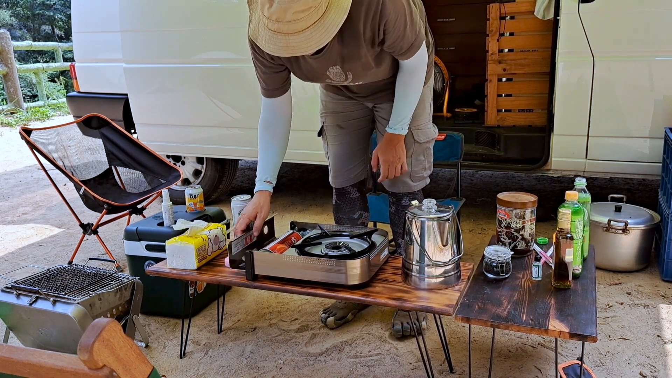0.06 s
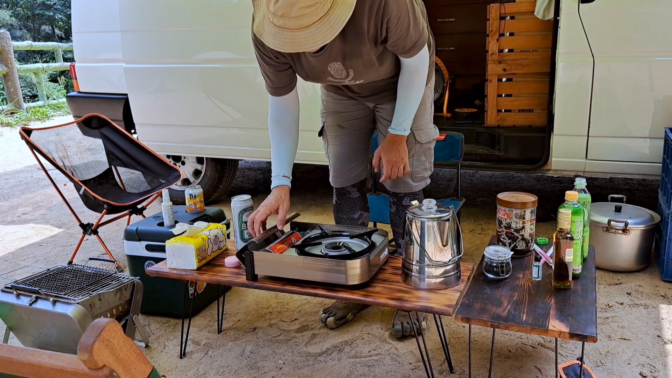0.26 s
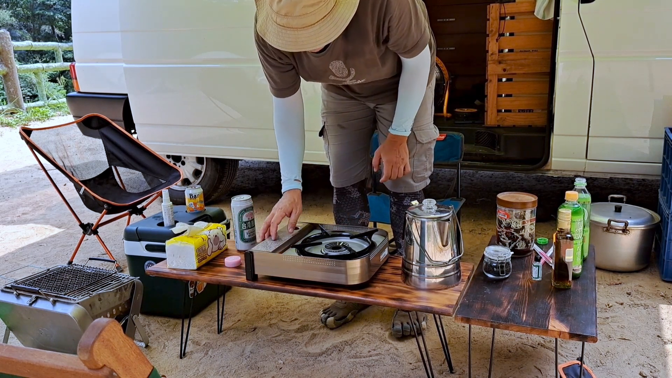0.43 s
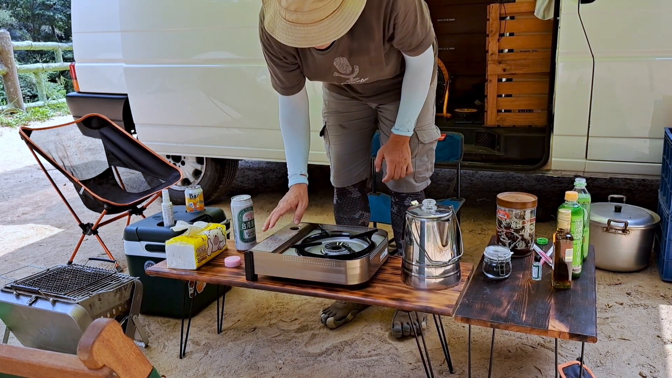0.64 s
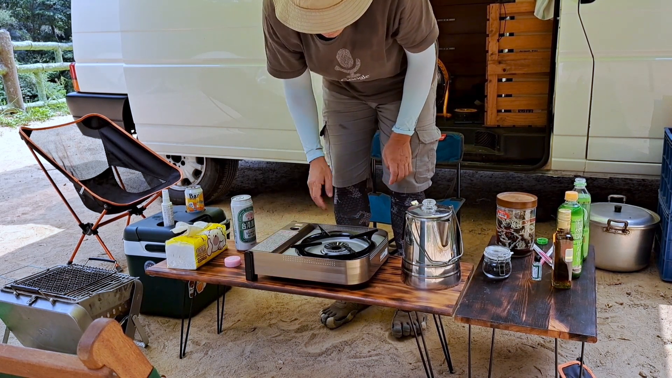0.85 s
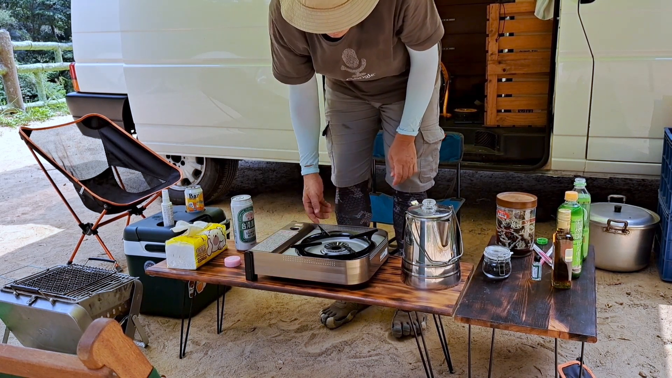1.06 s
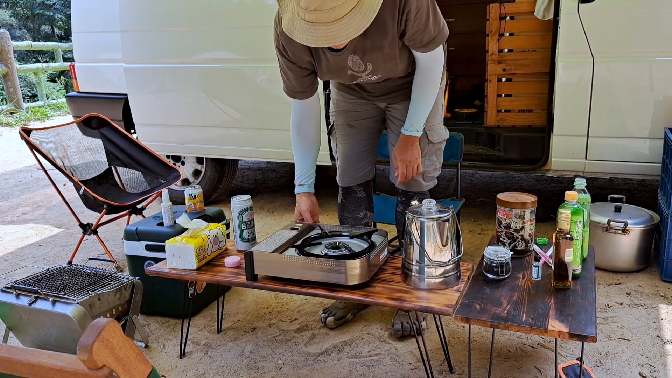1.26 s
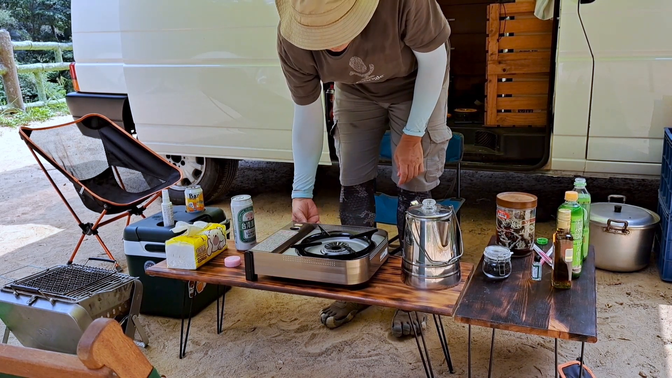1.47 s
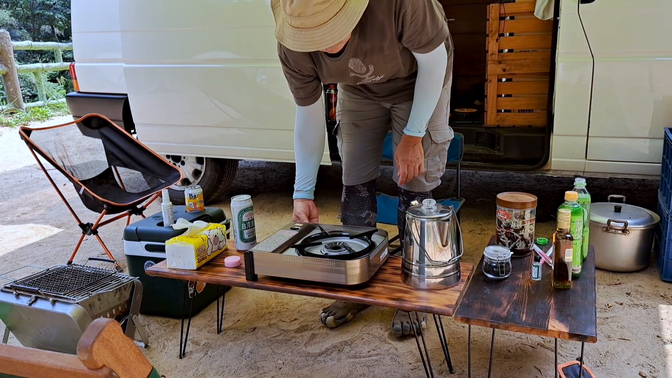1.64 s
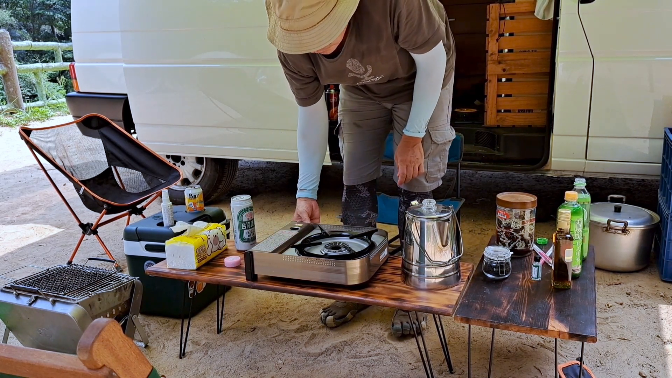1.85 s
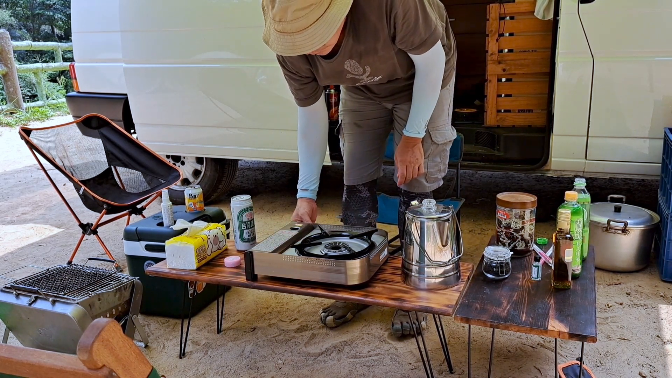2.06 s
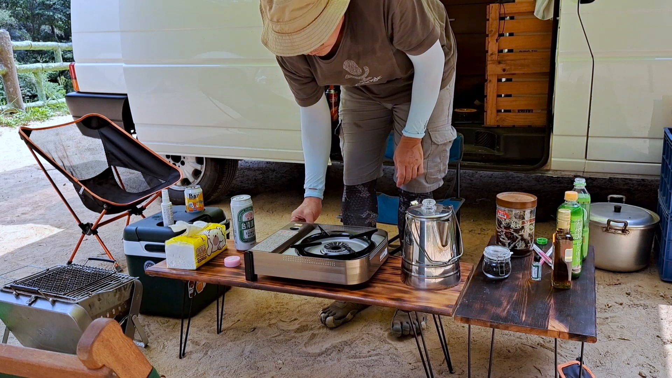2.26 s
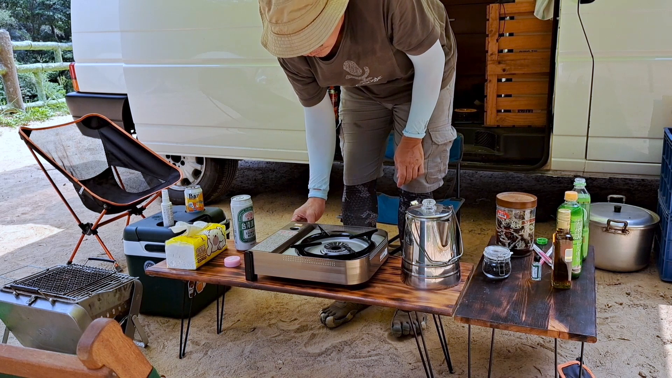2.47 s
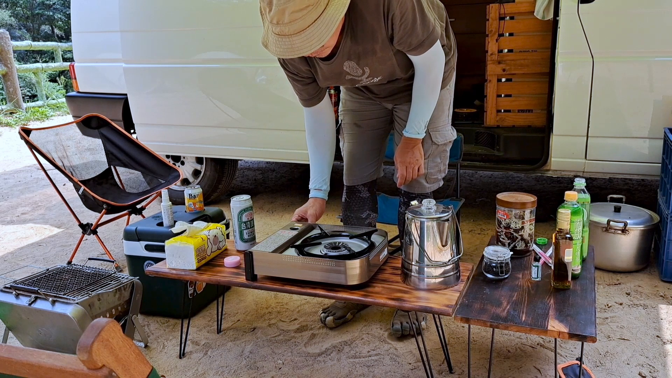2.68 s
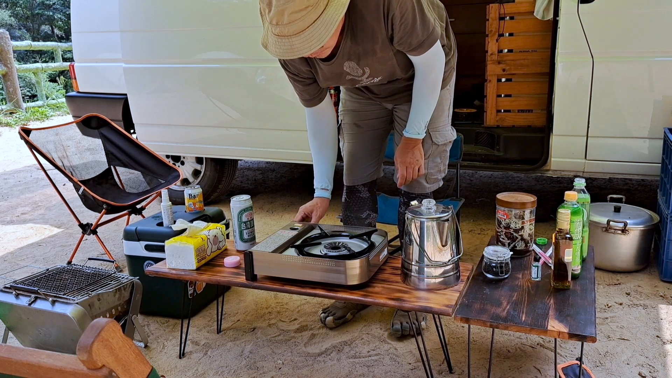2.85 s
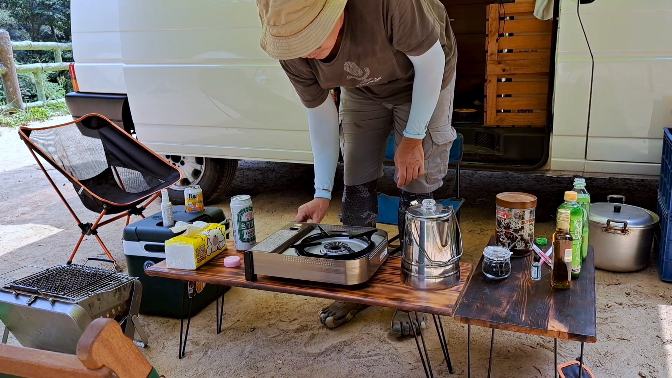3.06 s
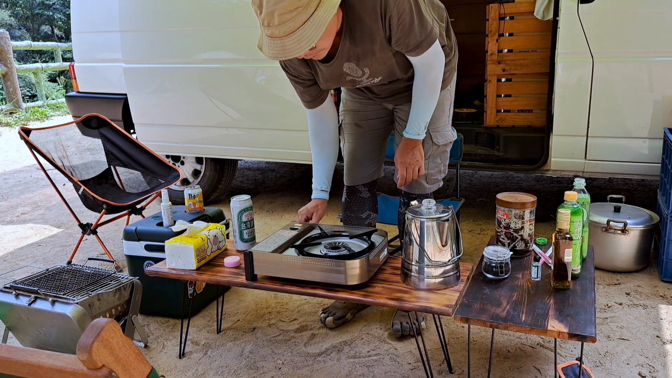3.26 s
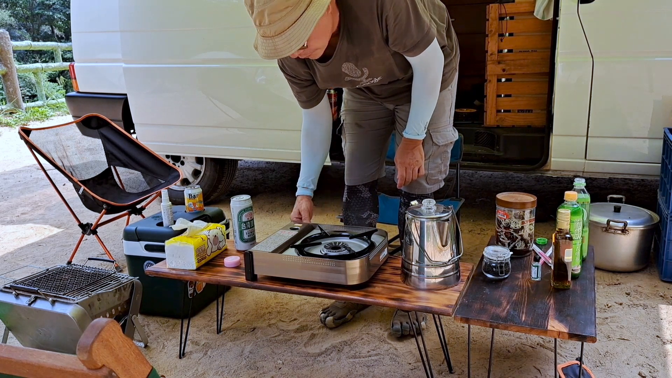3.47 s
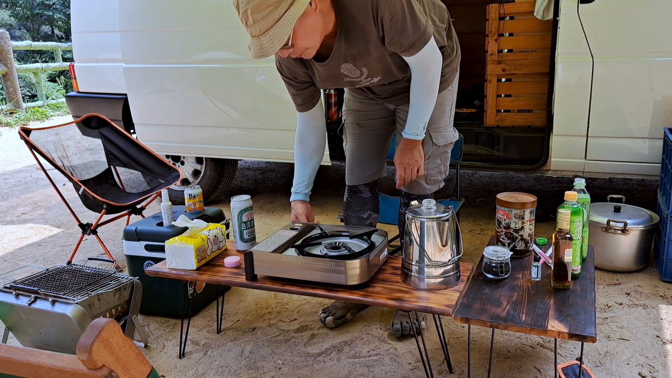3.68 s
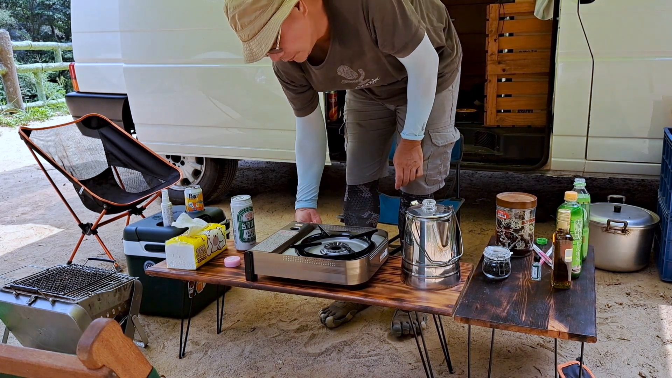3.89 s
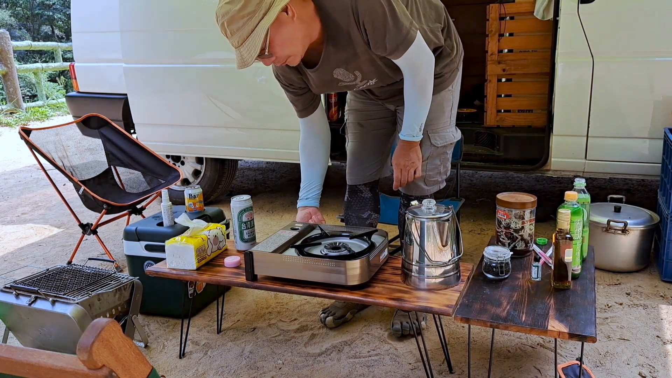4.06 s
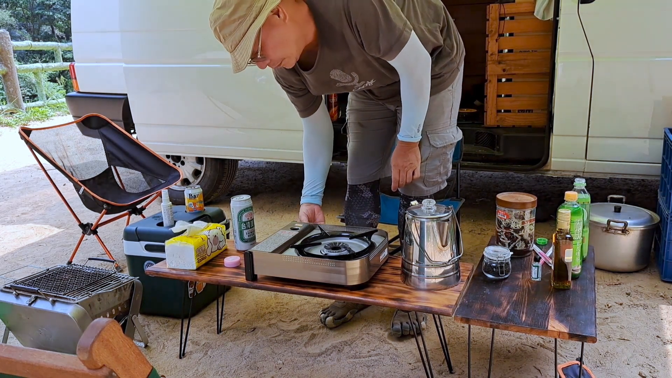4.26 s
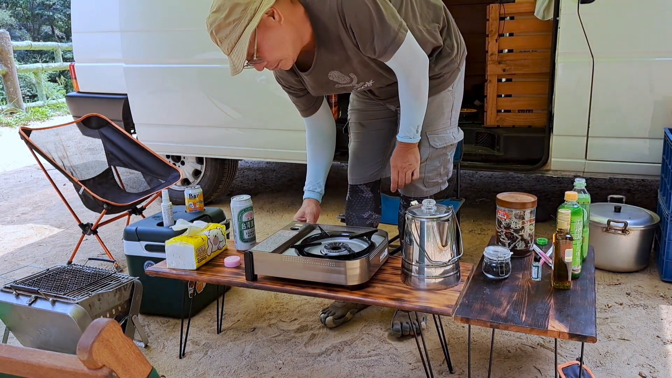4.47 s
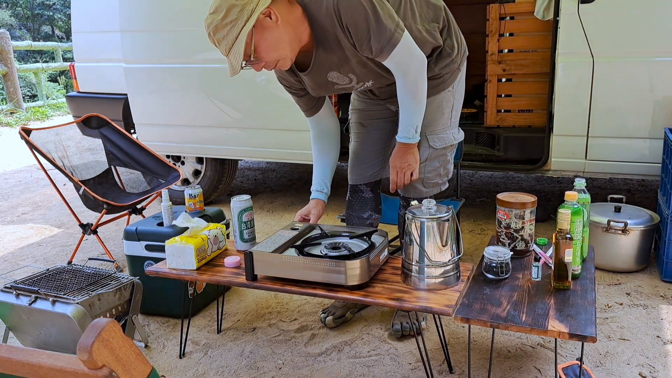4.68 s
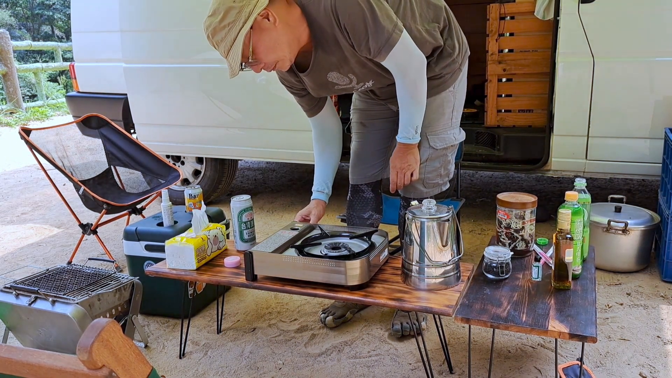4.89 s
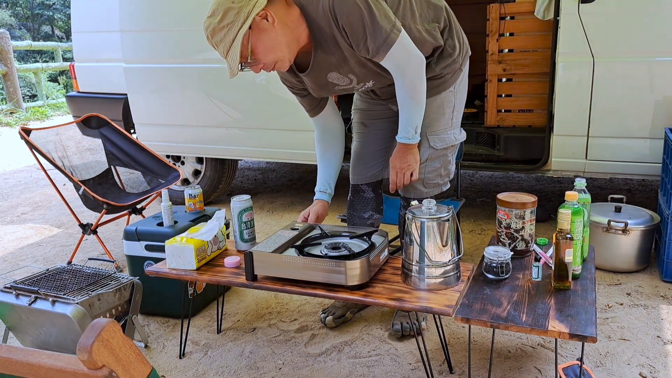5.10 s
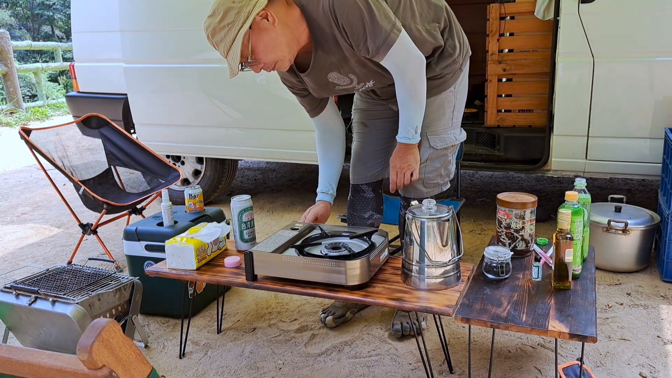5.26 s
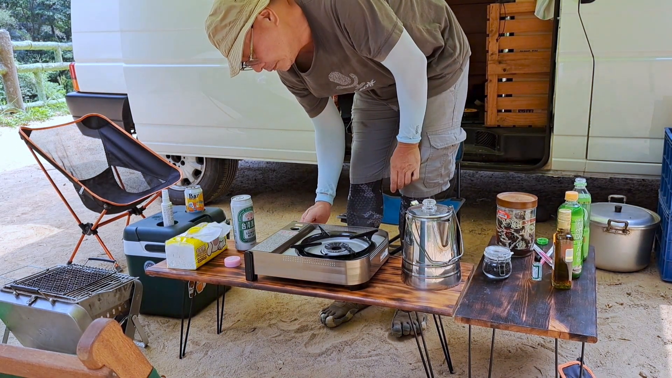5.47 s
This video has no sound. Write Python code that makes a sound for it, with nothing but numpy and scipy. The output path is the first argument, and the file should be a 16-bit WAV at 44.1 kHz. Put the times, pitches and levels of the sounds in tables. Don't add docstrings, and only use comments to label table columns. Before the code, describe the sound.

A tin stove lid slams shut, then fingers tap the metal case, a knob clicks twice and a lever clatters, over faint outdoor rumble.

```python
import sys
import numpy as np
from scipy import signal
from scipy.fft import rfft, irfft
from scipy.io import wavfile
from scipy.ndimage import uniform_filter1d

SR = 44100
rng = np.random.default_rng(int(sys.argv[2]) if len(sys.argv) > 2 else 0)


def ratio_of_db(decibels):
    return 10 ** (np.asarray(decibels, float) / 20)


def dump(signal):
    limited = np.clip(np.atleast_2d(signal).T, -1, 1)
    pcm = np.round(limited * 32767).astype(np.int16)
    wavfile.write(sys.argv[1], SR, pcm)


N = 243873


def evened(x):
    return x / np.sqrt(np.mean(x ** 2) + 1e-20)


def read(points, hz):
    f, value = np.transpose(points)
    return np.interp(np.log(hz + 1), np.log(f + 1), value)


def curves(rows):
    s, *columns = np.transpose(rows)
    return [np.interp(np.arange(N) / SR, s, column) for column in columns]


def add(mix, start_s, sound):
    part = mix[:, max(round(start_s * SR), 0):][:, :sound.shape[1]]
    part += sound[:, :part.shape[1]]


def ports(pair, likeness, lag=0):
    a, b = rfft(pair)
    hz = np.fft.rfftfreq(pair.shape[1], 1 / SR)
    same = np.clip(read(likeness, hz), 0, 1)
    mid = np.sqrt((1 + same) / 2) * a
    side = np.sqrt((1 - same) / 2) * b
    delay = np.exp(-2j * np.pi * hz * lag / SR)
    return irfft([mid + side, (mid - side) * delay], pair.shape[1])


def causal(gain_db):
    log_gain = np.log(ratio_of_db(np.r_[gain_db, gain_db[-2:0:-1]]))
    return np.fft.ifft(np.exp(np.conj(signal.hilbert(log_gain)))).real[:len(gain_db)]


def whitening_db(x, size):
    power = (abs(rfft(x, 16384)) ** 2).mean(0)
    power = uniform_filter1d(power, size=size)[::8]
    return -10 * np.log10(power / power.mean() + 1e-6)


def field(spectrum, patchy_db, swell_db, size):
    frames, hz = 4 * N // size + 5, np.fft.rfftfreq(size, 1 / SR)
    a, b, c, d, patches = rng.standard_normal((frames, len(hz), 5)).T
    patches = uniform_filter1d(patches, size=10, axis=0)
    patches = evened(uniform_filter1d(patches, size=12, axis=1))
    swell = evened(uniform_filter1d(rng.standard_normal(frames), size=20))
    level_db = read(spectrum, hz)[:, None] + patchy_db * patches + swell_db * swell
    z = np.array([a + 1j * b, c + 1j * d]) * ratio_of_db(level_db)
    return evened(signal.istft(z, nperseg=size, noverlap=3 * size // 4)[1][:, :N])


# freq_hz, level_db (per Hz)
TRAFFIC_SPECTRUM = [(24, -60), (40, -32), (58, -14), (150, 0), (324, -3), (355, -7), (527, -7), (577, -6),
                    (1500, -20), (1950, -65), (3300, -120)]
# freq_hz, likeness (0 to 1, anything below 0 counts as 0)
AIR_LIKENESS = [(60, 0.65), (150, 0.88), (380, 0.87), (950, 0.13), (2380, 0.17), (5980, -1.1),
                (15000, -0.05)]
# time_s, level_db
TRAFFIC_NEARNESS = [(0, -55.5), (.5, -67.5), (1.14, -59), (1.56, -63), (2.88, -52.5), (3.9, -62),
                    (4.34, -59.5), (4.8, -53), (5.53, -55)]
# freq_hz, level_db (per Hz)
LEAF_SPECTRUM = [(650, 4.5), (1100, 0.5), (1490, -1.5), (2780, -3), (3340, -6.5), (3610, -6), (4690, -4),
                 (5810, -6), (7710, -5), (8440, -10.5), (14700, -14), (15700, -27.5), (16500, -56)]
# centre_hz, width_hz, level_db
INSECT_BANDS = [(6590, 470, -72), (7350, 100, -77)]


def air():
    near_db, = curves(TRAFFIC_NEARNESS)
    traffic = ports(field(TRAFFIC_SPECTRUM, patchy_db=2.5, swell_db=1.0, size=1024), AIR_LIKENESS)
    leaves = ports(field(LEAF_SPECTRUM, patchy_db=0.5, swell_db=0.76, size=1024), AIR_LIKENESS)
    leaf_db = -62 + 6.5 + 0.061 * (near_db - near_db.mean())
    mix = traffic * ratio_of_db(near_db - 2.5) + leaves * ratio_of_db(leaf_db)
    for hz, width, db in INSECT_BANDS:
        band = [(hz - 2 * width, -40), (hz, 0), (hz + 2 * width, -40)]
        mix += ratio_of_db(db) * field(band, patchy_db=5.0, swell_db=0.5, size=512)
    return mix


# time_s, firing_hz, level_db
MOTOR_COURSE = [(0, 71.3, -62), (.6, 72.2, -61.5), (1.2, 70.3, -73), (2, 70.2, -65), (3.1, 72, -64),
                (3.7, 71.24, -61.5), (4.8, 71.05, -63), (5.53, 71.04, -62.5)]
# multiple, level_db
MOTOR_ORDERS = [(1, -3.5), (2, 0), (3, 0), (4, -4), (5, -3.5), (7, -11.5), (8, -3.5), (10, -10)]


def motor():
    firing_hz, level_db = curves(MOTOR_COURSE)
    turns, hum = np.cumsum(firing_hz) / SR, np.zeros(N)
    for multiple, db in MOTOR_ORDERS:
        fade = np.interp(np.arange(N), np.linspace(0, N, 30), rng.standard_normal(30))
        phase = multiple * turns + 0.068 * fade + rng.random()
        hum += ratio_of_db(level_db + db + 4.9 * fade) * np.sin(2 * np.pi * phase)
    return hum


# freq_hz, level_db (per Hz)
BUFFET_SPECTRUM = [(15, -30), (35, -12), (60, 4.5), (100, -7.5), (160, -16), (300, -17), (600, -67)]
# peak_s, strength_db, left_minus_right_db, length_s
GUSTS = [(0, -51, -11, 0.028), (0.18, -58, 8, 0.15), (0.493, -44.5, -2, 0.058), (0.689, -40, 0, 0.032),
         (0.82, -53, 21, 0.066), (0.937, -61, -8, 0.063), (1.03, -49, -2, 0.057), (1.257, -50, 5, .14),
         (1.378, -54.5, 18, 0.038), (1.77, -58, -17, 0.039), (2.065, -55, -4, .03), (2.27, -68, -3, 0.117),
         (2.636, -62, -18, 0.036), (3.077, -56, -11, 0.076), (3.206, -48, 3, .03), (3.367, -56, 5, 0.036),
         (3.83, -60, -2, 0.051), (4.3, -57, 3, .1), (4.68, -53, -1, .05), (4.914, -61, 6, 0.035),
         (5.53, -57, 25, 0.025)]


def breeze():
    t = np.arange(0, N + 64, 64) / SR
    lull_db = -63 - 9 * t
    strength = np.tile(ratio_of_db(lull_db), (2, 1))
    for s, db, pan_db, length_s in GUSTS:
        sides = ratio_of_db([[db + pan_db / 2], [db - pan_db / 2]])
        strength += sides * np.exp(-((t - s) / length_s) ** 2)
    lumps = field(BUFFET_SPECTRUM, patchy_db=2.5, swell_db=3.0, size=2048)
    lumps /= uniform_filter1d(lumps ** 2, size=2500) ** .3 + 1e-9
    return evened(lumps) * ratio_of_db(-4.5) * strength.repeat(repeats=64, axis=1)[:, :N]


# freq_hz, likeness (0 to 1)
CONTACT_LIKENESS = [(60, .7), (180, .97), (550, .97), (1200, .9), (2500, .72), (5000, .45), (9000, .3),
                    (15000, .25)]


def sheet_metal(t, sheet_db, sheet_t60):
    bright, dull = rng.standard_normal((2, len(t)))
    dull = signal.lfilter(*signal.butter(2, 2800, fs=SR), dull)
    sheet = bright * ratio_of_db(-60 * t / (0.75 * sheet_t60)) + dull * ratio_of_db(-60 * t / sheet_t60)
    sheet *= ratio_of_db(sheet_db) / np.linalg.norm(sheet)
    sheet[0] += 1
    return sheet


def ringing(t, modes, ring_db):
    mode_hz, mode_db, mode_t60 = np.transpose(modes)[:, :, None]
    struck = ratio_of_db(mode_db + 2.5 * rng.standard_normal(mode_db.shape))
    ring = (struck * ratio_of_db(-60 * t / mode_t60) * np.sin(2 * np.pi * mode_hz * t)).sum(0)
    ring *= ratio_of_db(ring_db) / np.linalg.norm(ring)
    ring[0] += 1
    return ring


def contacts(rows, crack, modes, rise, grit_db, ring_db, sheet_db, sheet_t60, peak_db, trim_db,
             thud_db, fizz_db):
    mix, t, hz = np.zeros((2, N)), np.arange(8000) / SR, np.fft.rfftfreq(2048, 1 / SR)
    thud_band = read([(900, 0.78), (1500, 0.24)], hz)
    fizz_band = read([(3800, 0.05), (5500, 1.0)], hz)
    for s, blow_db, hard_db, ring_hz, t60 in rows:
        grit = ratio_of_db(grit_db * np.clip(rng.standard_normal(200), -2, 1.5)).repeat(repeats=40)
        shape = (1 - np.exp(-t / rise)) ** 2 * ratio_of_db(-60 * t / t60)
        collisions = rng.standard_normal((2, len(t))) * evened(grit) * shape / shape.max()
        rattle = ports(collisions, CONTACT_LIKENESS, lag=1.5)
        sheet = sheet_metal(t, sheet_db, sheet_t60)
        clatter = signal.fftconvolve(rattle, sheet[None], axes=1)[:, :len(t)]
        colour_db = whitening_db(clatter, size=90) + read(crack, hz)
        colour_db += (thud_db - hard_db / 2) * thud_band
        colour_db += (fizz_db + hard_db / 2) * fizz_band
        colour_db += peak_db / (1 + ((hz - ring_hz) / (0.1 * ring_hz)) ** 2)
        ring = ringing(t, modes, ring_db)
        response = signal.fftconvolve(causal(colour_db), ring)[None, :len(t)]
        blow = ratio_of_db(blow_db + trim_db) * signal.fftconvolve(clatter, response, axes=1)
        add(mix, s - rise, blow)
    return mix


# start_s, level_db, hardness_db (treble over bass), ring_hz (loudest), rattle_t60_s
TOUCHES = [(.0024, -36.5, 1, 1450, 0.048), (1.2226, -31, -5, 2030, 0.027), (1.2794, -50, -18, 1000, 0.048),
           (1.3394, -50, -16, 965, 0.046), (1.4721, -42, -18, 1840, 0.039),
           (1.694, -40.5, -32, 2050, 0.048), (1.7275, -37.5, 13, 3900, 0.18), (1.7514, -38, 6, 1420, 0.073),
           (1.7994, -49.5, -18, 1160, 0.059), (2.7801, -42.5, 10, 2090, 0.047),
           (2.8464, -51, 6, 1000, 0.048), (2.8973, -48, -1, 1350, 0.091), (2.9312, -41.5, -2, 2970, 0.052),
           (2.9544, -59, -11, 1298, .073), (3.0604, -39, 3, 2970, 0.052), (3.0844, -52, -17.5, 2060, 0.068),
           (3.1657, -42, -2, 2100, 0.037), (3.3014, -38.5, -14, 2210, .045),
           (3.3244, -63, -6.5, 1270, 0.058), (3.5374, -47.5, -19, 1490, 0.056),
           (4.123, -31, -9, 1540, 0.065), (4.18, -44, -14, 1480, 0.047), (4.3335, -48.5, 9, 2170, 0.1)]
# freq_hz, level_db
TOUCH_CRACK = [(90, -44), (300, 2), (700, 5.5), (1200, 0), (2200, -2), (3100, -8), (3700, -6.5),
               (8000, -5.5), (14000, -15.5), (17000, -19)]
# freq_hz, level_db, t60_s
KNOB_MODES = [(260, 12, 0.14), (784, -14, 0.071), (1000, 20, 0.037), (2200, -5, 0.3), (2290, -3, 0.027),
              (2590, -20, 0.21), (2960, -17, 0.039), (3740, 36, 0.02), (4500, -70, 0.054),
              (6160, -32, 0.02)]


def touches():
    return contacts(TOUCHES, TOUCH_CRACK, KNOB_MODES, rise=.0006, grit_db=3.0, ring_db=-26.5,
                    sheet_db=-1.5, sheet_t60=0.15, peak_db=9.5, trim_db=0.5, thud_db=-3.5, fizz_db=-6.5)


# freq_hz, t60_s
YARD_DECAY = [(200, 1), (500, 0.43), (2000, 0.33), (6000, 0.35), (15000, 0.33)]


def yard(x):
    taps = np.zeros((2, 16000))
    at = np.arange(120, 15900, 20) + rng.integers(0, 20, (2, 789))
    np.put_along_axis(taps, at, rng.choice([-1., 1.], at.shape), 1)
    hz, t, z = signal.stft(ports(taps, CONTACT_LIKENESS), SR, nperseg=256)
    fading = z * ratio_of_db(-60 * t / read(YARD_DECAY, hz)[:, None])
    tail = signal.istft(fading, SR, nperseg=256)[1]
    tail = signal.fftconvolve(tail, causal(whitening_db(tail, size=50))[None], axes=1)
    return signal.fftconvolve(x, tail / np.linalg.norm(tail[0]), axes=1)[:, :N]


# start_s, level_db, hardness_db, ring_hz, rattle_t60_s
LATCH = [
    (.3595, -36, -8.5, 1620, 0.064),
]
# freq_hz, level_db
LID_CRACK = [(90, -23), (210, -5.5), (380, -9.5), (550, 5.5), (1200, 1), (2200, -1.5), (3000, -1),
             (4800, 3), (6000, 1.5), (8000, 1.5), (15300, -1.5), (15900, -27), (17000, -37)]
# freq_hz, level_db, t60_s
LID_MODES = [(221.7, 11, 0.22), (495, -23, 0.32), (533, 17, 0.076), (685, 2, 0.017), (839, -1, 0.019),
             (1240, -23, 0.06), (1365, -23, .1), (1660, -22, 0.18), (2036, 8, 0.14), (2150, -35, .5),
             (2200, -18, .2), (3616, 9, 0.11), (4900, 13.5, 0.057), (7075, -19, .06), (8620, -22, .06)]


def latch():
    return contacts(LATCH, LID_CRACK, LID_MODES, rise=0.00104, grit_db=10.0, ring_db=-46.0,
                    sheet_db=-1.0, sheet_t60=0.18, peak_db=23.0, trim_db=-2.0, thud_db=-2.0, fizz_db=-1.5)


# start_s, level_db, hardness_db, ring_hz, rattle_t60_s
LID = [
    (.3955, -13.5, -6, 2280, 0.078),
    (.4005, -13.5, 7, 1320, 0.036),
    (.412, -25.5, -15, 1850, 0.12),
    (.4544, -40, -2, 7300, 0.061),
]


def lid():
    return contacts(LID, LID_CRACK, LID_MODES, rise=0.00133, grit_db=0.5, ring_db=-17.5,
                    sheet_db=-6.5, sheet_t60=0.15, peak_db=10.5, trim_db=2.5, thud_db=-3.0, fizz_db=-4.5)


# start_s, level_db, hardness_db, ring_hz, rattle_t60_s
SETTLE = [
    (.56, -58, 0, 2200, 0.27),
    (.63, -52, 0, 2190, .3),
    (.70, -57.5, 0, 2110, 0.44),
]


def settling():
    return contacts(SETTLE, LID_CRACK, LID_MODES, rise=0.003, grit_db=2.0, ring_db=-30.0,
                    sheet_db=-8.0, sheet_t60=0.13, peak_db=18.5, trim_db=-3.0, thud_db=-11.0, fizz_db=-19.0)


# start_s, level_db, hardness_db, ring_hz, rattle_t60_s
KNOB = [
    (2.2975, -39, -8, 1970, 0.033),
    (2.3395, -15.5, 10, 2100, 0.028),
    (2.3425, -19.5, 8, 3460, 0.019),
    (2.348, -31, -19, 790, 0.13),
    (2.4995, -46.5, -2.5, 2230, 0.092),
    (4.617, -18.5, 19.5, 3560, 0.016),
    (4.6205, -19, -1, 2200, 0.025),
    (4.6255, -30, -33, 2290, 0.09),
]
# freq_hz, level_db
KNOB_CRACK = [(90, -10), (260, -4.5), (450, -9.5), (700, 2.5), (1400, -9), (2100, 0.5), (2700, -2),
              (3550, -7), (4700, -1.5), (6300, 4), (9000, -3), (15300, 0), (15900, -27), (17000, -36)]


def knob():
    return contacts(KNOB, KNOB_CRACK, KNOB_MODES, rise=0.00073, grit_db=4.5, ring_db=-14.5,
                    sheet_db=-7.0, sheet_t60=0.11, peak_db=5.5, trim_db=6.0, thud_db=-11.5, fizz_db=-13.0)


# start_s, level_db, hardness_db, ring_hz, rattle_t60_s
LEVER = [
    (3.7849, -35, -12, 830, 0.066),
    (3.8217, -21.5, -10, 520, 0.063),
    (3.8354, -27, 8.5, 567, 0.18),
    (3.8475, -28, 3, 2160, 0.073),
    (3.8592, -27.5, -20, 576, 0.11),
    (3.8704, -32.5, 3, 755, 0.17),
    (3.8884, -23, 14.5, 477, 0.067),
]
# freq_hz, level_db
LEVER_CRACK = [(90, -21), (240, 1.5), (550, 0), (950, 1.5), (1500, -4.5), (2200, -3.5), (3400, -12.5),
               (5000, -7.5), (8000, -6.5), (14000, -11.5), (16000, -38), (17000, -40)]
# freq_hz, level_db, t60_s
LEVER_MODES = [(264, -12.5, 0.062), (396, -7, 0.14), (469, -3.5, 0.15), (567, 6, 0.095), (794, 4, 0.12),
               (890, -11, 0.049), (982, 11, 0.041), (1446, -33.5, 0.13), (2230, 4, 0.016),
               (2920, -37, 0.023)]


def lever():
    return contacts(LEVER, LEVER_CRACK, LEVER_MODES, rise=.0007, grit_db=5.5, ring_db=-17.5,
                    sheet_db=-4.5, sheet_t60=0.2, peak_db=4.0, trim_db=10.0, thud_db=-10.5, fizz_db=-10.5)


def scene():
    stove = touches() + latch() + lid() + settling() + knob() + lever()
    echoes = ratio_of_db(-14.5) * yard(stove)
    return stove + echoes + air() + motor() + breeze()


def low_pass(x):
    return signal.sosfilt(signal.butter(12, 16620, fs=SR, output="sos"), x)


def record(dry):
    edge = signal.firwin(511, 16550, window=("kaiser", 9), fs=SR)
    mix = signal.oaconvolve(dry, edge[None], "same")
    return low_pass(mix)


dry = scene()
out = record(dry)
dump(out)
```